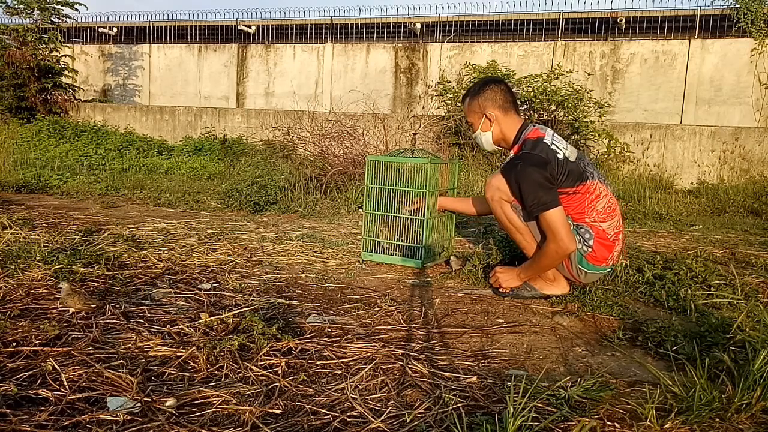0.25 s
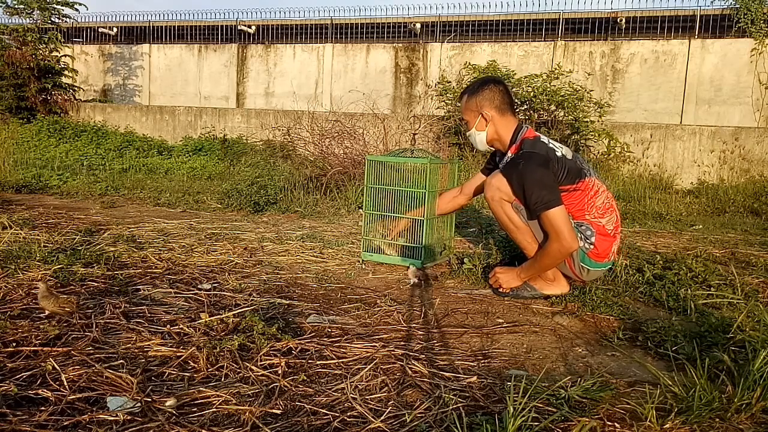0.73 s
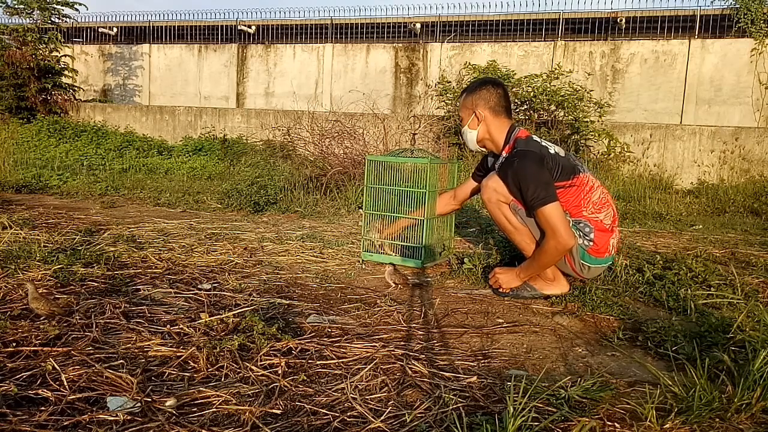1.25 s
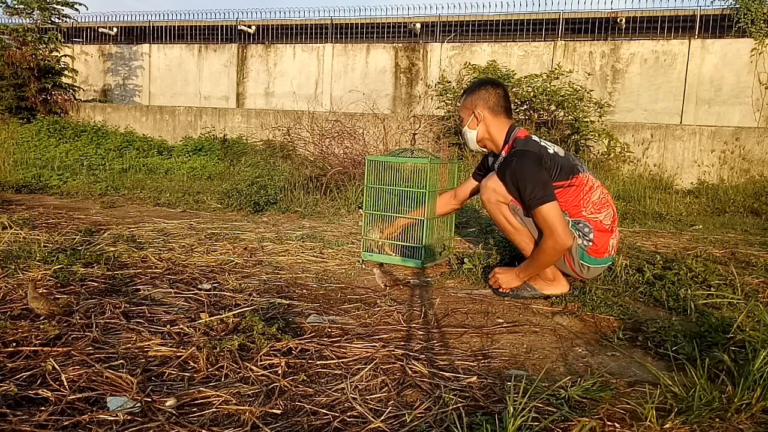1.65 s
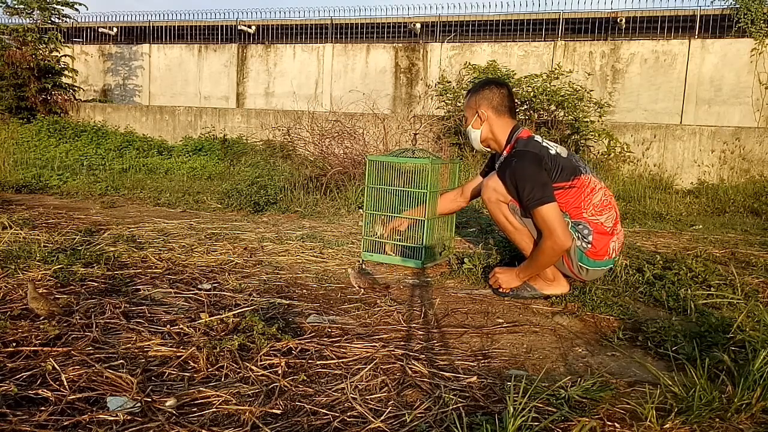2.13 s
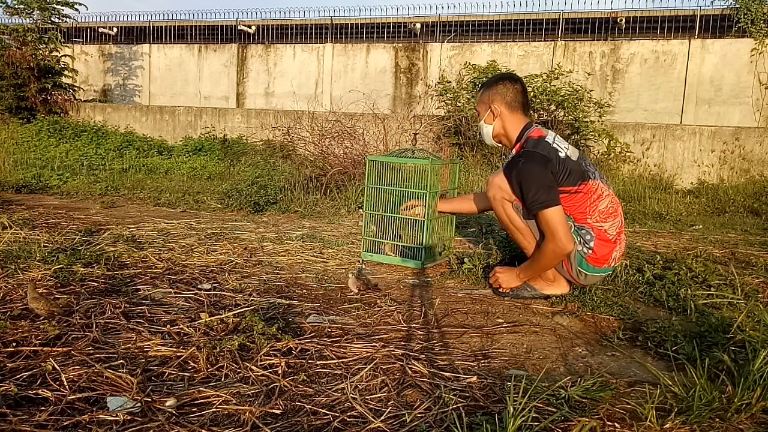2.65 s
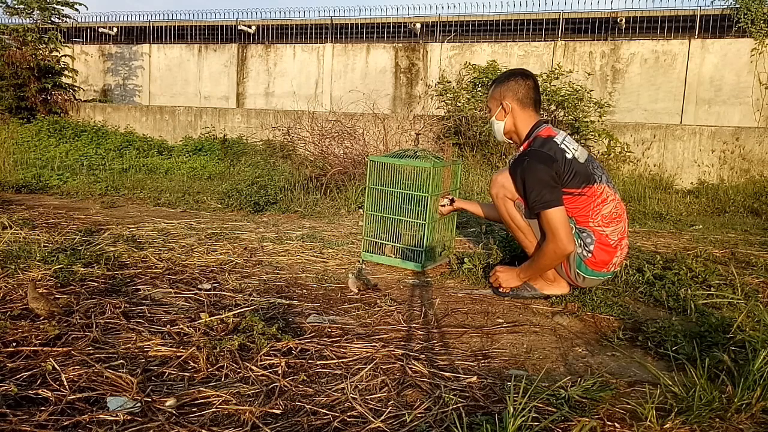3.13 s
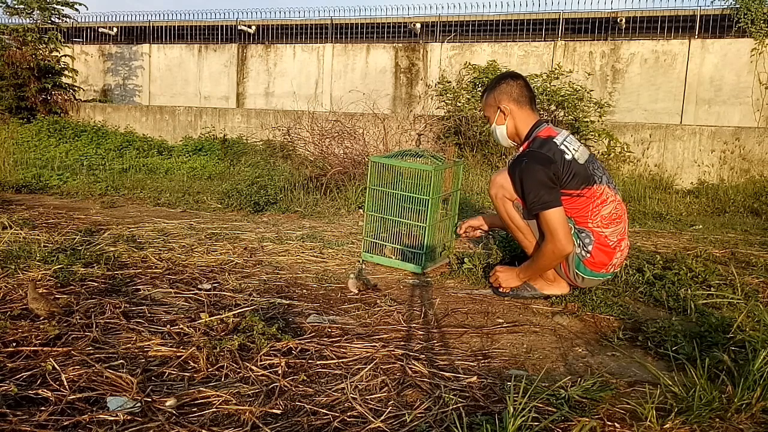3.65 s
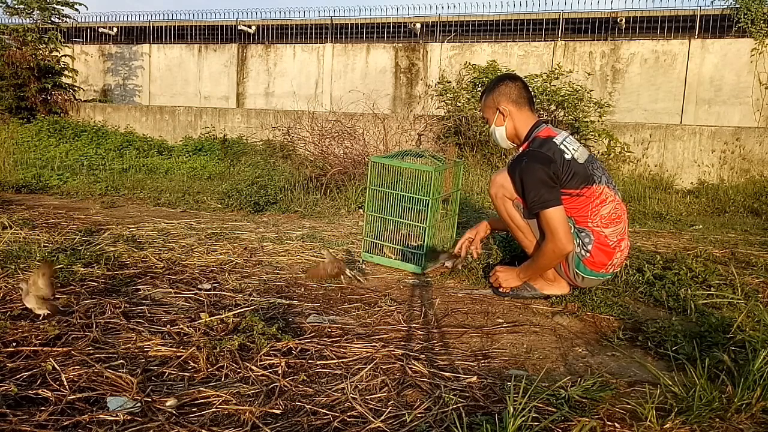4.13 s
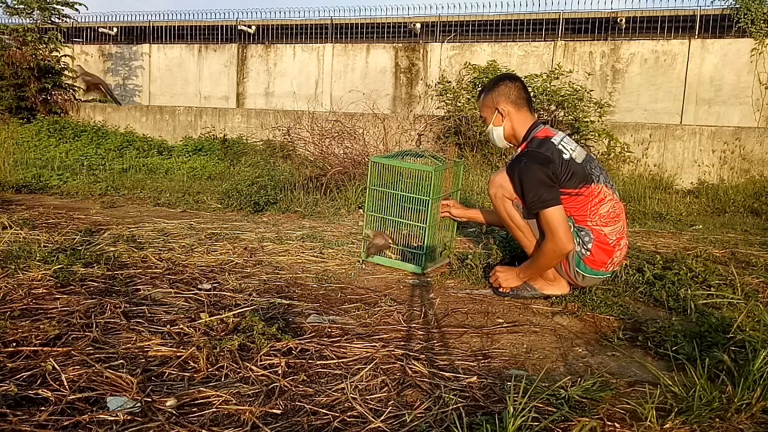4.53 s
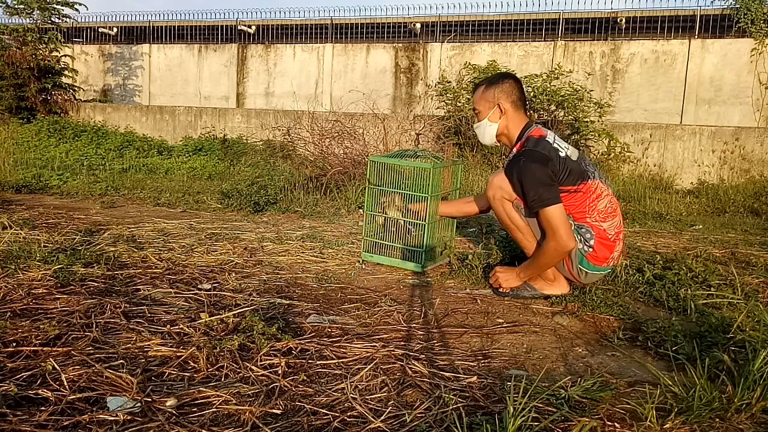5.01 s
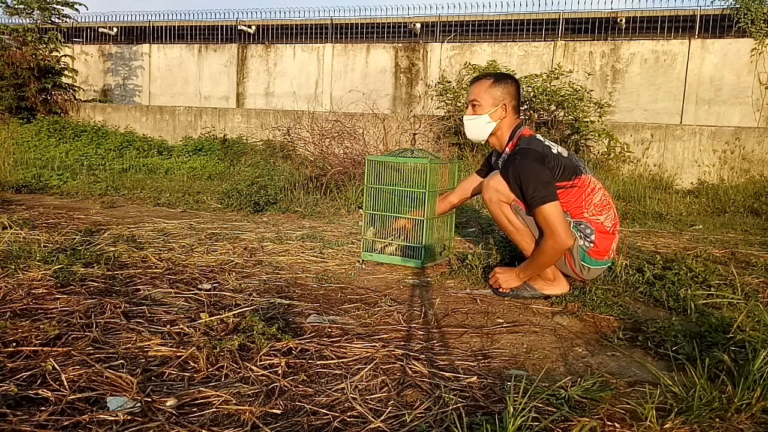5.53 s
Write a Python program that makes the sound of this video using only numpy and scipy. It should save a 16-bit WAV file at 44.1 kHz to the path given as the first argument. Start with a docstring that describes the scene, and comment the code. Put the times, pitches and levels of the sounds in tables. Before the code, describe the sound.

Small birds flutter and scrape in rattling bursts inside a light wire cage outdoors, then one claps its wings and whirrs away over low town rumble.

```python
"""Small birds flutter in a light wire cage on waste ground; one claps its wings and flies off.
Wing tips ring the bars, feathers brush them in noisy scrapes, the tray thuds, a yard wall echoes.
Behind: filtered-noise town rumble and hiss, a faint ticking buzz, two cricket choruses in noise bands,
one near cricket and far bird notes from swept sines. Source levels are ahead of the microphone ports."""
import sys
import numpy as np
from scipy import signal
from scipy.fft import rfft, irfft, next_fast_len
from scipy.io import wavfile
from scipy.ndimage import uniform_filter1d

SR = 44100
rng = np.random.default_rng(int(sys.argv[2]) if len(sys.argv) > 2 else 0)


def pcm_store(signal):
    """Save signal as 16-bit PCM."""
    levels = np.round(np.clip(np.atleast_2d(signal), -1, 1) * 32767)
    wavfile.write(sys.argv[1], SR, levels.astype(np.int16).T)


N = 254456
TIME = np.arange(N) / SR
SIZE = next_fast_len(N)
FREQ = np.maximum(np.fft.rfftfreq(SIZE, 1 / SR), 1)

# wing tips striking the bars: t/s, nominal level/dB, ring f/Hz, tray knock re blow/dB
STRIKES = [(0.083, -35.5, 4030, -32), (0.179, -42, 3500, -31), (0.253, -32, 3960, -25),
           (0.281, -28.5, 2600, -13), (0.2952, -31.5, 3970, -4), (0.311, -45, 3330, -17),
           (0.33, -44, 3300, -20), (0.3647, -32, 3640, -13), (0.38, -24.5, 2300, -8),
           (0.3885, -26, 3430, -12), (0.4144, -39, 4070, -0.5), (0.4557, -25.5, 2500, -9.5),
           (0.4757, -30, 4000, -10), (0.5018, -37, 3440, -8.5), (0.5472, -20.5, 2300, -24),
           (0.5704, -30, 2420, -29), (0.6015, -25.5, 4460, -16.5), (0.622, -36, 4040, -13),
           (0.631, -28.5, 3880, -16), (0.6679, -54, 3900, -20), (0.6795, -29.5, 1670, -20),
           (0.717, -30, 2920, -22), (0.7523, -39.5, 3500, -7), (0.8054, -25.5, 1480, -21),
           (0.8325, -34, 1480, -25), (0.851, -28, 1000, -16.5), (0.866, -41, 4000, -23),
           (0.878, -35, 3460, -24), (0.915, -24.5, 2450, -29), (0.9304, -25.5, 3300, -11),
           (0.9492, -32, 3920, -8), (0.9712, -29, 2450, -26), (0.977, -33, 2450, -13),
           (1.043, -36.5, 2520, -12), (1.1123, -33, 2500, -24), (1.244, -38.5, 3970, -38),
           (1.844, -36.5, 4750, -24), (1.8853, -37, 3650, -30), (1.9025, -27.5, 3960, -22),
           (1.949, -41, 2080, -10.5), (1.9747, -33.5, 2580, -34), (2.008, -44, 4210, -30),
           (2.0252, -29.5, 4140, -24), (2.0785, -42.5, 4000, -33), (2.13, -47, 4540, -27),
           (2.285, -57, 2010, -30), (2.302, -34, 4400, -32), (2.312, -44, 2050, -25),
           (2.3454, -45, 3770, -10), (2.3606, -38, 2300, -23), (2.4034, -41, 3700, -28),
           (2.417, -39, 4030, -30), (2.4298, -32, 4440, -29), (2.4689, -46, 3350, -33),
           (2.484, -42.5, 3540, -30), (2.5407, -41, 4130, -32), (2.558, -41, 3660, -40),
           (2.565, -36.5, 3850, -36), (2.574, -51, 4610, -38), (2.6111, -38, 1950, -32),
           (2.632, -28, 4370, -39), (2.676, -37.5, 2040, -31), (2.7046, -40.5, 3940, -37),
           (4.344, -32.5, 3480, -28), (4.507, -32, 2600, -26), (4.5855, -31.5, 4060, -27),
           (4.9574, -32.5, 4230, -22), (5.0267, -34, 2090, -11), (5.051, -32, 3600, -7),
           (5.066, -29.5, 2800, -16), (5.071, -36, 1410, -18), (5.094, -30, 3300, -23),
           (5.1126, -25, 2580, -14), (5.124, -29, 3240, -6), (5.1285, -25, 2870, -17),
           (5.1455, -24, 3480, -15), (5.1565, -25, 3870, -25), (5.1735, -36, 3300, -22),
           (5.184, -33, 3680, -15), (5.197, -30, 2600, -25), (5.218, -22.5, 4350, -17),
           (5.225, -25, 2600, -11), (5.296, -35.5, 3900, -27), (5.303, -28, 2900, -11),
           (5.311, -35, 3280, -14), (5.3756, -29.5, 3300, -9), (5.3903, -37, 2320, -26),
           (5.4027, -23, 2660, -19), (5.435, -35, 3520, -27), (5.451, -21, 2800, -16.5),
           (5.461, -25.5, 1510, -13), (5.489, -42, 2940, -17), (5.5174, -40, 3660, -3),
           (5.531, -51, 3530, -16)]
# wing beats of the bird flying off: t/s, nominal level/dB, ring f/Hz
FLIGHT = [(4.313, -48, 3700), (4.4097, -43.5, 3240), (4.4432, -41.5, 3600), (4.4763, -44, 3420),
          (4.539, -44, 2880), (4.5727, -43, 3000), (4.604, -47, 3370), (4.6713, -46, 3100),
          (4.704, -63, 2900), (4.7503, -52, 4010)]


def undb(db):
    """Decibels to amplitude gain."""
    return 10 ** (np.asarray(db) / 20)


def along(table):
    """Rows of (f/Hz, value) interpolated over log frequency."""
    hz, value = np.transpose(table)
    return np.interp(np.log(FREQ), np.log(hz), value)


def columns(table):
    """Rows of (t/s, values) interpolated at every sample."""
    s, *values = np.transpose(table)
    return [np.interp(TIME, s, v) for v in values]


def through(x, gain):
    """Filter by a zero-phase gain per frequency."""
    return irfft(rfft(x, SIZE) * gain, SIZE)[..., :N]


def band(hz, width_hz):
    """Gain of a flat-topped, steep band about a centre."""
    return np.exp(-np.abs(2 * (FREQ - hz) / width_hz) ** 3)


def level(x, db):
    """Scale to an rms level."""
    return x * undb(db) / np.sqrt(np.mean(x ** 2))


def walk(rate_hz):
    """Random levels, held one period and smoothed twice; spread near 1."""
    k = int(SR / rate_hz)
    held = np.repeat(rng.standard_normal(N // k + 1), k)
    return 1.46 * uniform_filter1d(uniform_filter1d(held, k), k)[:N]


def add(out, s, sound):
    """Mix a short sound in at a time."""
    i = int(s * SR)
    out[..., i:i + sound.shape[-1]] += sound[..., :N - i]


def pair(a, b, alike):
    """Two ports: a feeds what they share, b their difference, by likeness per frequency."""
    c = np.clip(along(alike), 0, 1)
    mid = through(a, np.sqrt((1 + c) / 2))
    side = through(b, np.sqrt((1 - c) / 2))
    return np.array([mid + side, mid - side])


def far_noise(gain):
    """Diffuse coloured noise; the ports agree less at higher frequencies above 100 Hz."""
    # likeness of the ports, far sounds: f/Hz, likeness/0-1
    far_alike = [(30, 0.22), (100, 1), (300, 0.83), (700, 0.11), (1500, 0.019)]
    return through(pair(*rng.standard_normal((2, N)), far_alike), gain)


def hiss():
    """Faint steady diffuse noise of fixed colour."""
    # spectrum: f/Hz, relative density/dB
    colour = [(400, -12.5), (900, -13), (2950, -21), (4300, -16.5), (5000, -9), (5500, -30), (7400, -42),
              (9470, -23), (11000, -36), (15500, -31.5)]
    return level(far_noise(undb(along(colour))), -76)


def rumble():
    """Deep town noise; its upper part swells on its own, the deepest bass once."""
    # spectrum: f/Hz, relative density/dB
    colour = [(20, -20.5), (38, -26), (72, -10.5), (82, -1), (92, -8), (115, -5), (130, 1), (164, -8.5),
              (191, -10.5), (198, 0.5), (206, -13), (261, -16.5), (394, -29), (550, -41), (1200, -71.5)]
    # swell, each column taken re its mean: t/s, level/dB, upper part/dB
    swell = [(0, -43.5, -4), (1.0, -44.5, -1.5), (1.3, -45.5, -10), (2, -41.5, -3), (2.55, -41.5, -8.5),
             (2.7, -43.5, -2.5), (2.97, -42.5, -4.5), (3.1, -45.5, -14), (3.33, -41.5, -11),
             (3.7, -43, -14), (4.2, -41.5, -13), (4.35, -43.5, 0), (4.9, -43, -4), (5.45, -44, -3.5),
             (5.77, -41, -9.5)]
    puff_s, puff_half_s, puff_db = 3.1, 0.3, 10  # peak time, 1/e half-width, peak lift
    db, upper_db = columns(swell)
    noise = level(far_noise(undb(along(colour))), -45.5)
    low = through(noise, 1 / (1 + (FREQ / 225) ** 12))
    upper = noise - low
    lift_db = puff_db * np.exp(-((TIME - puff_s) / puff_half_s) ** 2)
    low = low + (undb(lift_db) - 1) * through(noise, FREQ < 62)
    return undb(db - db.mean()) * (low + undb(upper_db - upper_db.mean() + 2.0) * upper)


def buzz():
    """Dull ticks at a steady rate, each of random strength and sign."""
    rate_hz, start_s, rms_db = 50, .0012, -77
    ticks = np.zeros(N)
    at = (np.arange(start_s, N / SR, 1 / rate_hz) * SR).astype(int)
    ticks[at] = rng.standard_normal(len(at))
    dull = band(600, 1100) / FREQ ** 1.5 * (FREQ > 300)
    return level(through(ticks, dull), rms_db)


def chorus():
    """Many far crickets blur into narrow noise bands that flicker."""
    # bands: f/Hz, width/Hz, rms level before swell/dB
    bands = [(3380, 230, -76.5), (3495, 84, -78.5), (3746, 150, -82), (4445, 480, -70), (4750, 390, -72)]
    # swell, each column taken re its median: t/s, low chorus/dB, high chorus/dB
    swells = [(0, -75.5, -64), (1.2, -74, -62.5), (3, -78, -68), (3.9, -73.5, -66), (5.77, -72, -64)]
    low_db, high_db = columns(swells)
    out = 0
    for hz, width_hz, db in bands:
        swell_db = low_db if hz < 4000 else high_db
        flicker_db = 1.5 * walk(40)
        out = out + level(far_noise(band(hz, width_hz)), db) * undb(swell_db - np.median(swell_db) + flicker_db)
    return out


def cricket():
    """Three pulses to a chirp, each falling in pitch, the first the weakest."""
    # first pulse of each chirp: t/s, level before pulse weights/dB
    chirps = [(0.029, -60.5), (.865, -63), (1.09, -55), (1.317, -57), (1.544, -56.5), (1.771, -60),
              (3.265, -65), (3.858, -56), (4.056, -57.5), (4.251, -55.5), (4.443, -57), (4.64, -58),
              (4.87, -55)]
    pulse_s, spacing_s, start_hz, fall_hz_per_s = 0.014, .0315, 5080, 32000
    out, t = np.zeros(N), np.arange(int(pulse_s * SR)) / SR
    phase = 2 * np.pi * np.cumsum(start_hz - fall_hz_per_s * t) / SR
    pulse = np.hanning(len(t)) * np.sin(phase)
    for s, db in chirps:
        for k, weight_db in enumerate((-3, 0.5, 0.5)):
            add(out, s + spacing_s * k, undb(db + weight_db) * pulse)
    return out


def far_birds():
    """Thin hoarse gliding sines, pitch and level shaken at random."""
    # notes: t/s, length/s, start f/Hz, end f/Hz, level before shake/dB, hoarseness/Hz
    notes = [(0.558, .12, 3850, 4120, -58, 60), (1.132, 0.36, 1640, 1646, -77, 25.1),
             (3.222, 0.13, 2270, 2010, -84, 69.4), (3.824, 0.18, 2060, 2250, -77.5, 170),
             (4.018, 0.12, 2100, 2260, -78, 130), (5.537, 0.15, 2710, 2810, -75, 25),
             (5.714, 0.036, 4130, 4200, -58.5, 191)]
    out = np.zeros(N)
    for s, length_s, hz, end_hz, db, hoarse_hz in notes:
        n = int(length_s * SR)
        # held 150 samples
        shake = rng.standard_normal((2, 1 + n // 150)).repeat(150, axis=1)[:, :n]
        phase = 2 * np.pi * np.cumsum(np.linspace(hz, end_hz, n) + hoarse_hz * shake[0]) / SR
        swell = signal.windows.tukey(n, .35) * undb(7.3 * uniform_filter1d(shake[1], size=500))
        add(out, s, undb(db) * swell * np.sin(phase))
    return out


def whirr():
    """Air in the wings of the passing bird: soft noise swells, pulsed by the wing beat."""
    # swells: peak t/s, 1/e half-width/s, rms level before swell/dB, f/Hz, width/Hz
    swells = [(4.38, 0.13, -73, 1800, 2916), (4.61, 0.1, -66, 1300, 940), (4.71, 0.21, -70, 2660, 1400)]
    beat_s = .0327
    beat = 1 + .7 * np.cos(2 * np.pi * (TIME - FLIGHT[0][0] - .002) / beat_s)
    out = 0
    for s, half_s, db, hz, width_hz in swells:
        air = through(rng.standard_normal((2, N)) * beat, band(hz, width_hz))
        out = out + level(air, db) * np.exp(-((TIME - s) / half_s) ** 2)
    return out


def clap():
    """Air squeezed out between the wings: a sharp suck, then a slower rippling rebound."""
    clap_s, clap_db = 4.28045, -16  # nominal peak
    out, t = np.zeros(N), np.arange(-16, 128) / SR
    suck = np.exp(-(t / .000075) ** 2)
    ripple = 1 + .55 * np.cos(2 * np.pi * 4300 * (t - .00037))
    rebound = .38 * np.exp(-((t - .0003) / .00024) ** 2) * ripple
    add(out, clap_s + t[0], undb(clap_db) * (rebound - suck))
    return np.array([out, 0.22 * np.roll(out, 6)])


def scrapes(rate_hz, spread_db, fade_s):
    """Gate of tiny scrapes at random moments and sizes, each dying fast over a thin steady part."""
    sizes = undb(np.minimum(spread_db * rng.exponential(size=N), 14))
    hits = (rng.random(N) < rate_hz / SR) * sizes
    fading = signal.lfilter([1], [1, -np.exp(-1 / (fade_s * SR))], hits)
    return level(fading + 0.24, 0)


def stir():
    """Feathers rustle most just after a blow and settle between blows."""
    rest_share, settle_s = .48, .011
    blows = np.zeros(N)
    blows[[int(row[0] * SR) for row in list(STRIKES) + list(FLIGHT)]] = 1
    settling = signal.lfilter([1], [1, -np.exp(-1 / (settle_s * SR))], blows)
    return rest_share + np.minimum(settling, 1)


def effort():
    """Brushing level and relative level of moved air at every sample."""
    # bouts of fluttering, one curve each: t/s, brushing level before stir/dB, low flap of air re it/dB
    bouts = [
        [(0, -91, -11), (0.095, -68, -11), (0.235, -59.5, -9), (0.265, -50.5, -2.5), (0.385, -50, -1.5),
         (0.45, -50, -2), (0.52, -50.5, -10), (0.64, -49, -16), (0.72, -51, -4), (0.86, -53.5, 2),
         (0.96, -50, 0), (1.1, -55.5, -8), (1.2, -68.5, -15), (1.45, -77, -9)],
        [(1.82, -86, -14), (1.855, -59.5, -12), (1.93, -54.5, -8.5), (2.11, -55, -38), (2.2, -65.5, -19)],
        [(2.27, -61, -20), (2.315, -59, -28), (2.37, -57.5, -25), (2.43, -52.5, -27), (2.53, -59, -20),
         (2.6, -54.5, -23), (2.72, -55.5, -34), (2.8, -68, -17), (2.95, -72, -19)],
        [(4.245, -80, -4), (4.27, -57, -2.5), (4.36, -56.5, -2), (4.42, -60.5, -13), (4.5, -60, -17),
         (4.62, -64, -10), (4.75, -60.5, -13), (4.9, -69, -10)],
        [(4.9, -72, -17), (5.0, -54.5, -12), (5.03, -48, 0.5), (5.07, -53, 6.5), (5.14, -46.5, 1.5),
         (5.225, -44.5, 3), (5.25, -55.5, -7), (5.285, -62, 3.5), (5.31, -45, -13), (5.335, -57.5, -4),
         (5.39, -50.5, -13), (5.46, -51.5, 0), (5.53, -56, 1.5), (5.62, -69, -7), (5.72, -79, -7)],
    ]
    return columns([row for bout in bouts for row in bout])


def brushing():
    """Scrapes gate feather noise of ever-changing colour; air puffs lie below, fine barbs above."""
    # feather spectrum: f/Hz, relative gain/dB
    feather = [(590, -49), (1000, -21), (1660, -3.5), (2540, 1), (3790, 3.5), (4470, 0.5), (5220, -4.5),
               (8000, -21), (10400, -59.5), (17600, -120)]
    # bands lifted or thinned by gentle shuffling on the mesh: f/Hz, width/Hz, share
    wire = [(2070, 510, 0.04), (2840, 900, -0.83)]
    db, air_db = effort()
    common, noise = scrapes(220, 3.0, .001), rng.standard_normal((2, N))
    body = 0
    for hz in 1300 * 1.337 ** np.arange(7):
        gate = common + .7 * scrapes(220, 3.5, .001)
        body = body + undb(4.6 * walk(25)) * through(noise * gate, band(hz, 0.46 * hz))
    body = level(through(body, undb(along(feather))), -0.056)
    # with little air moving, the feet and feathers are on the mesh
    gentle = np.clip(-air_db / 12 - .7, 0, 1)
    mesh = sum(share * band(hz, width_hz) for hz, width_hz, share in wire)
    body = body + gentle * through(body, mesh)
    air_gate = uniform_filter1d(common, size=300) ** 1.02
    air_colour = band(530, 2000) / np.sqrt(1 + (FREQ / 500) ** 2)
    air = level(through(noise * air_gate, air_colour), 0.82)
    barb_gate = uniform_filter1d(common, size=160) + 0.53
    barbs = level(through(noise * barb_gate, band(8500, 14000)), -20)
    return undb(db) * (stir() * (body + barbs) + undb(air_db) * air)


def strikes():
    """Each blow is a crack of feather noise that rings two bars, knocks the tray and ticks in the treble."""
    # tray modes: f/Hz, level before scatter/dB, t60/s
    tray = [(198, -2.5, 0.042), (315, -2, 0.029), (430, 0, 0.02), (574, -12, 0.05), (928, -10, 0.027)]
    other_range_hz, pole_width_hz = (1900, 4600), 1500  # neighbouring bar; damping of each pole
    crack_s, crack_log_spread, rise_s = 0.0013, 0.3, .0003
    drag_s, drag_share = 0.006, 0.24  # the tip then drags softly along the bar
    # tick re blow: -16 dB for a -47 dB blow, less for a louder one
    tick_db, tick_shrink, tick_scatter_db = -16, 0.22, 7
    ring, thud, tick = np.zeros((3, 2, N))
    t = np.arange(2048) / SR
    hz, mode_db, t60_s = np.transpose(tray)[:, :, None]
    for s, db, bar_hz, thud_db in list(STRIKES) + [(*beat, -24) for beat in FLIGHT]:
        a, b = rng.standard_normal(2)
        other_hz = rng.uniform(*other_range_hz)
        length_s = max(crack_s * np.exp(crack_log_spread * a), 1e-4)
        # a few barbs let go one after another
        slips = np.repeat(rng.exponential(size=len(t) // 32), 32)
        slips[:32] = 1.94  # the first contact is firm
        fade = np.exp(-t / length_s) + drag_share * np.exp(-t / drag_s)
        noise = rng.standard_normal((2, len(t))) * slips * fade * (1 - np.exp(-t / rise_s))
        energy = np.mean(np.sum(noise ** 2, axis=1))
        noise = 0.39 * noise / np.sqrt(2 * energy / (length_s * SR))
        # each bar: one complex pole, passed twice
        poles = np.exp(np.pi * (2j * np.array([bar_hz, other_hz]) - pole_width_hz) / SR)
        bar, other = (signal.lfilter([1], [1, -p], signal.lfilter([1], [1, -p], noise)).imag for p in poles)
        bar = bar + 0.59 * other
        bar = bar / np.abs(bar).max(axis=1, keepdims=True)
        add(ring, s, undb(db) * (0.77 * bar + 0.69 * noise))
        mode_gain = undb(mode_db + 3.25 * rng.standard_normal((2, len(tray), 1)))
        sign = np.sign(rng.standard_normal(hz.shape))
        modes = mode_gain * np.sin(2 * np.pi * hz * t) * sign
        add(thud, s, undb(db + thud_db) * (modes * 1000. ** (-t / t60_s)).sum(axis=1))
        rel_db = tick_db - tick_shrink * (db + 47) + tick_scatter_db * b
        add(tick, s, undb(db + rel_db) * noise)
    return through(ring, band(4650, 5980)) + thud + through(tick, band(12000, 13400))


def scene():
    """Birds close by with their inverted, band-limited wall echo; the rest is background."""
    # likeness of the ports, near sounds: f/Hz, likeness/0-1
    near_alike = [(300, .97), (2000, .92), (4500, .56), (9000, .27)]
    echo_s, echo_db = .012, -17
    birds = brushing() + strikes() + clap() + whirr()
    late = np.roll(birds, int(echo_s * SR), axis=1)
    birds = birds - undb(echo_db) * through(late, band(3000, 4100))
    background = rumble() + buzz() + chorus() + cricket() + far_birds() + hiss()
    return pair(*birds, near_alike) + background


def record(dry):
    """The two ports differ in sensitivity by frequency; an elliptic low-pass cuts the top."""
    # left port over right: f/Hz, difference/dB
    ports = [(60, 7), (1000, 6), (2300, 7), (4400, -1.2), (8000, 4), (14000, 1)]
    top_hz, gain_db = 15300, 1.53
    heard = through(dry, undb(np.outer([.5, -.5], along(ports)) + gain_db))
    return signal.sosfilt(signal.ellip(8, .2, 70, top_hz, fs=SR, output="sos"), heard)


dry = scene()
out = record(dry)
pcm_store(out)
```